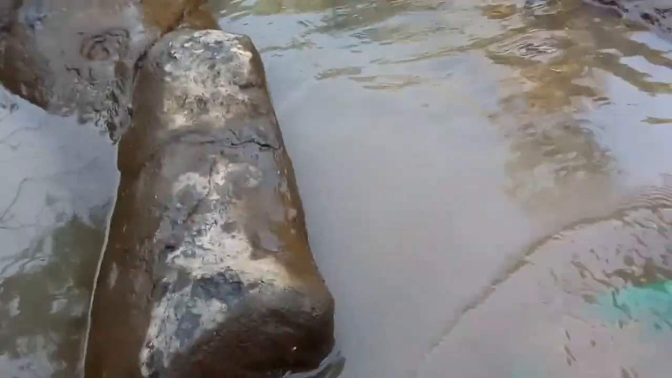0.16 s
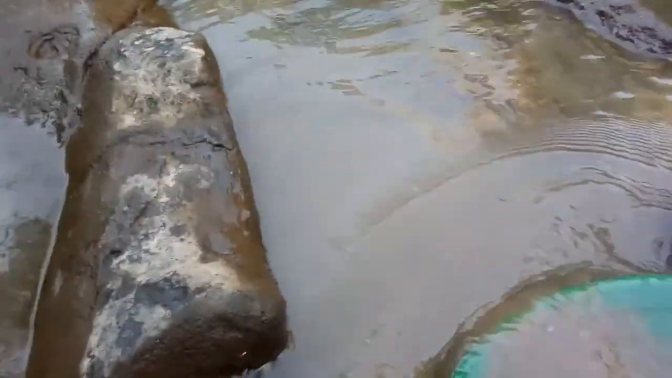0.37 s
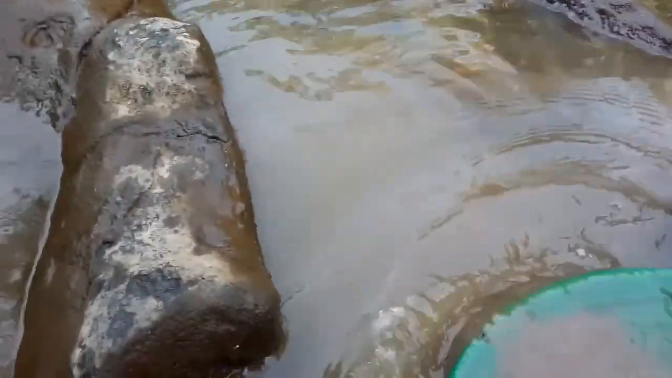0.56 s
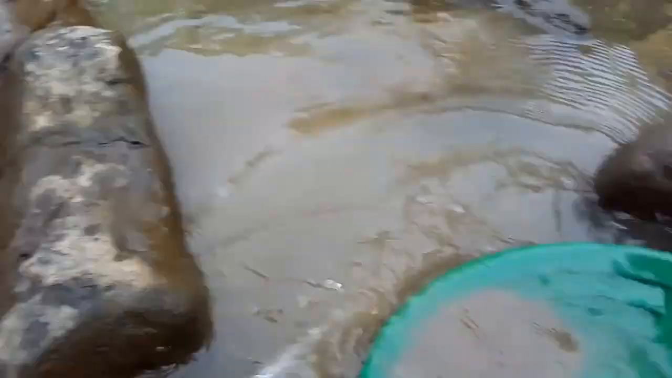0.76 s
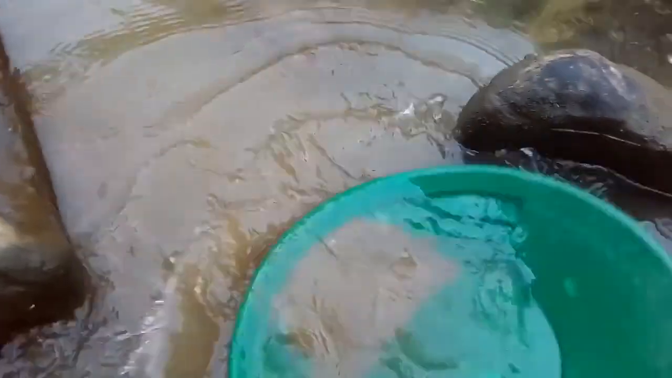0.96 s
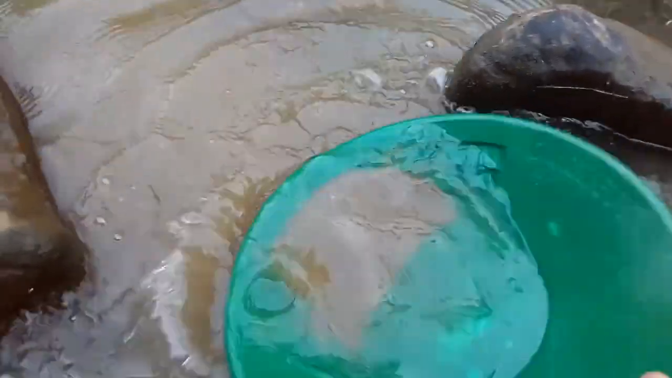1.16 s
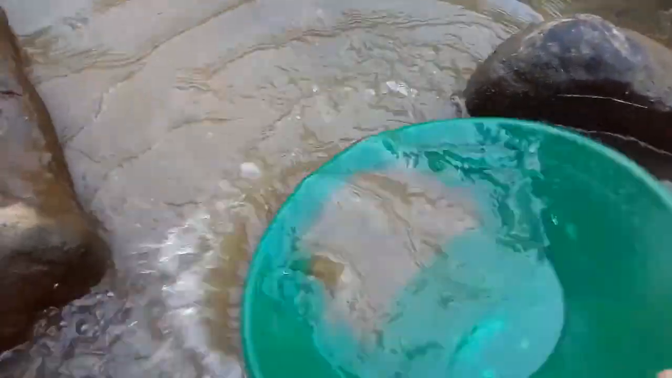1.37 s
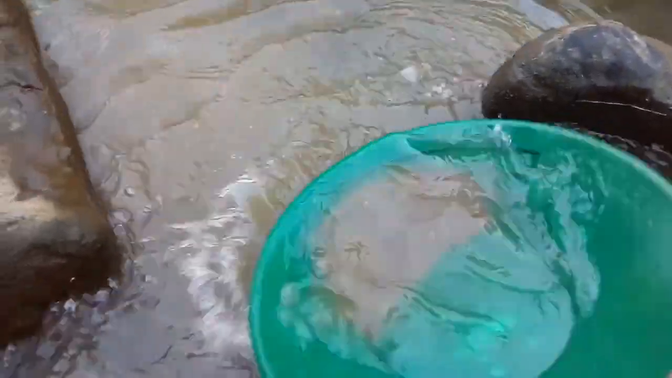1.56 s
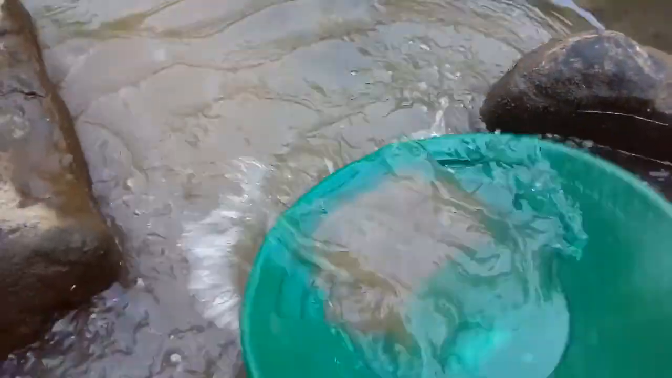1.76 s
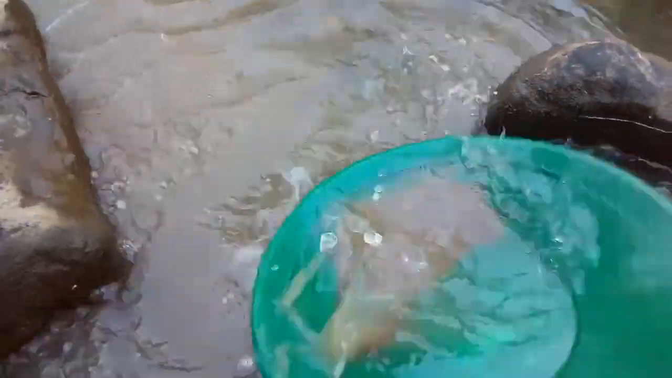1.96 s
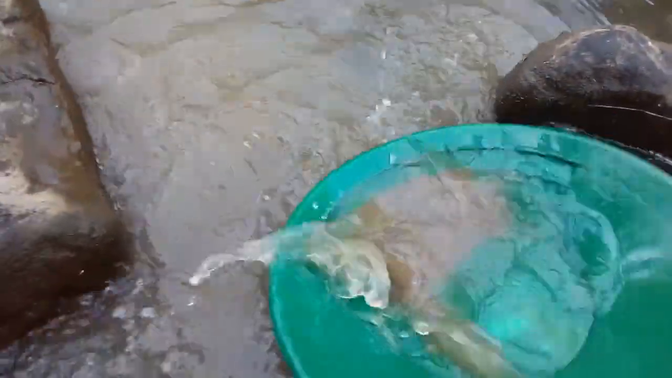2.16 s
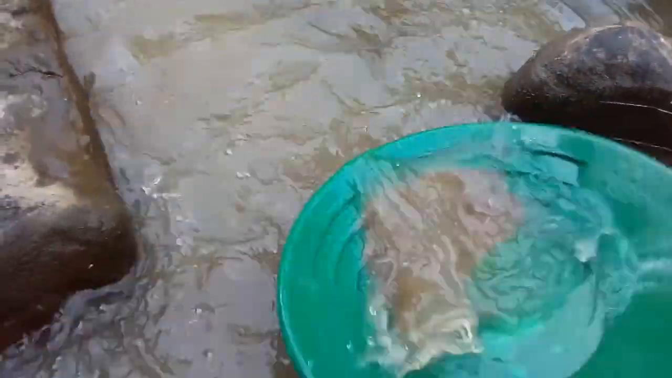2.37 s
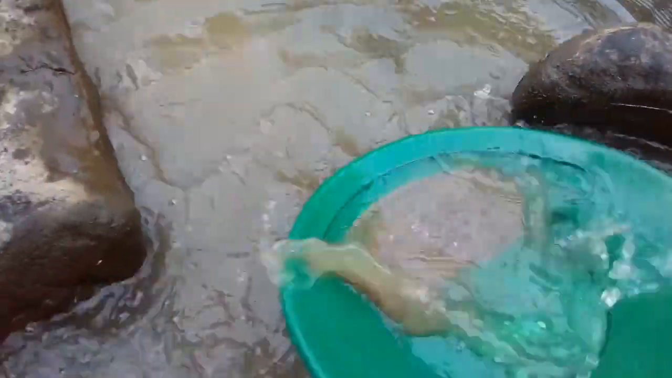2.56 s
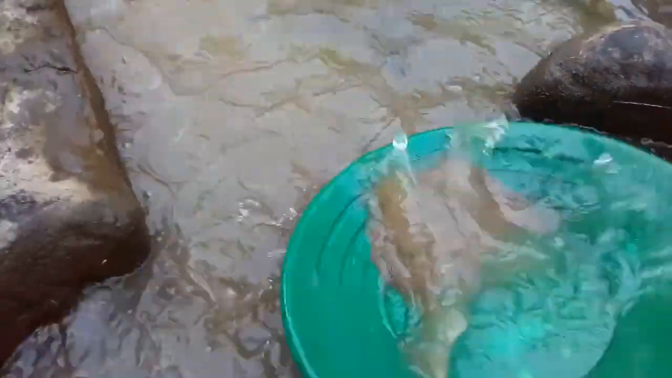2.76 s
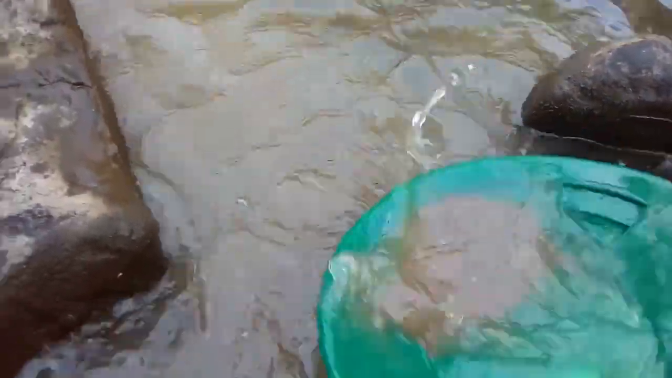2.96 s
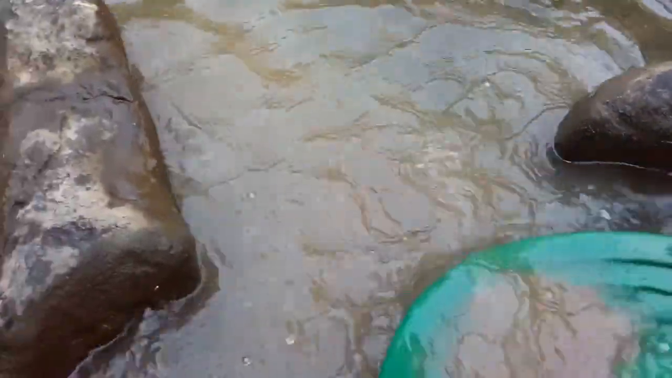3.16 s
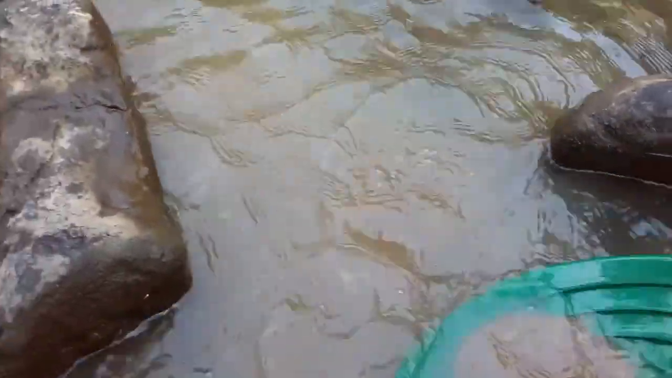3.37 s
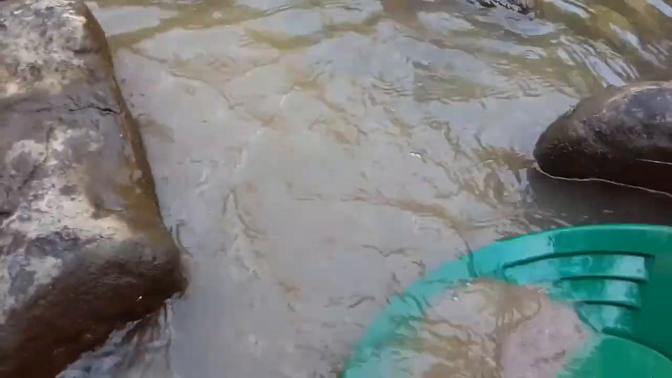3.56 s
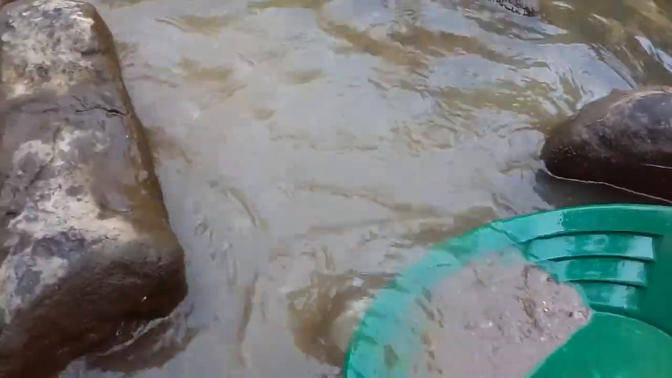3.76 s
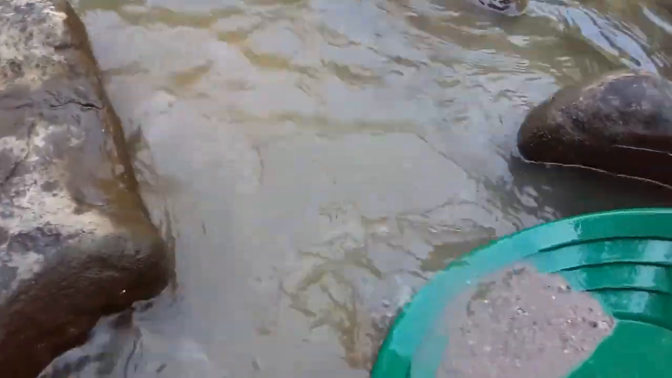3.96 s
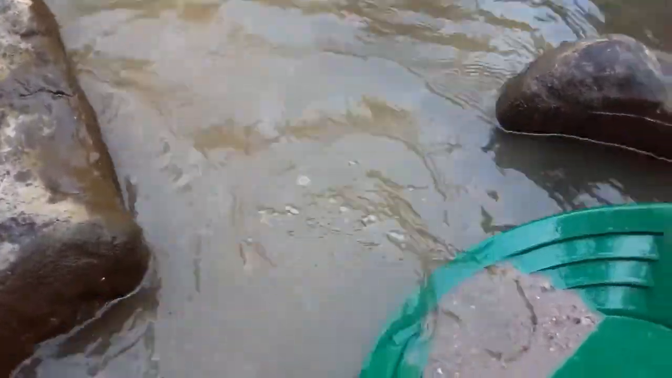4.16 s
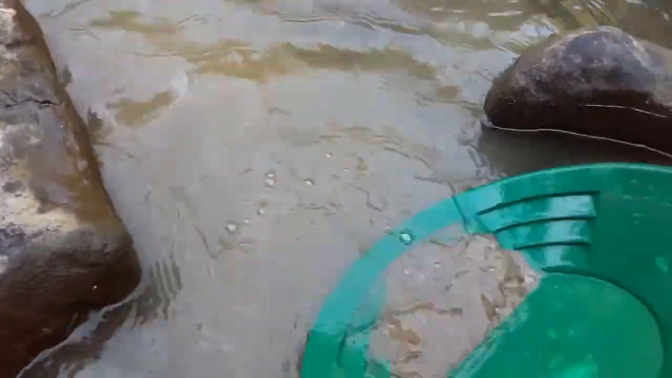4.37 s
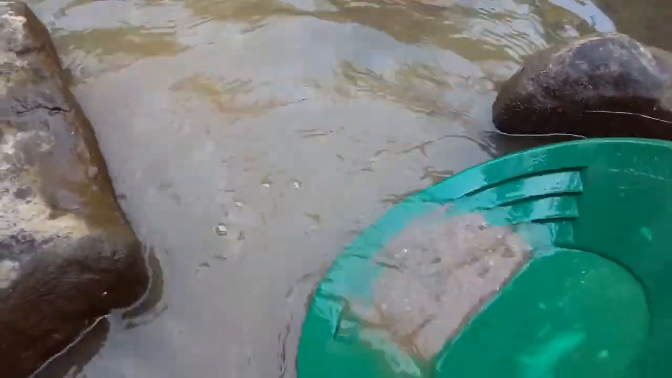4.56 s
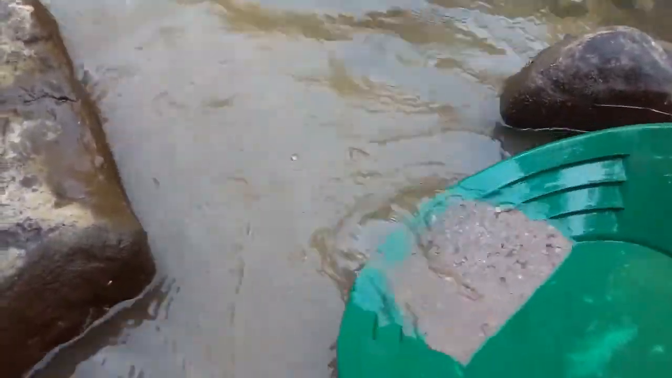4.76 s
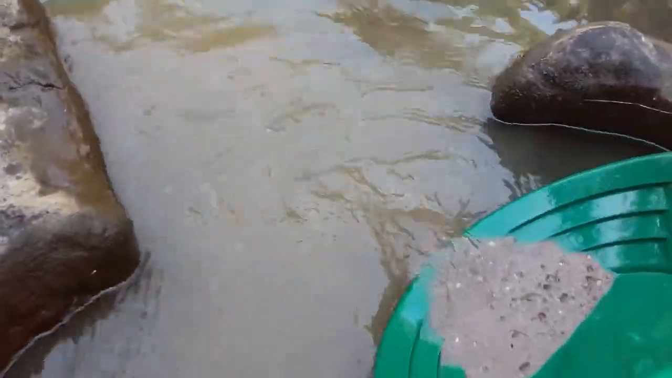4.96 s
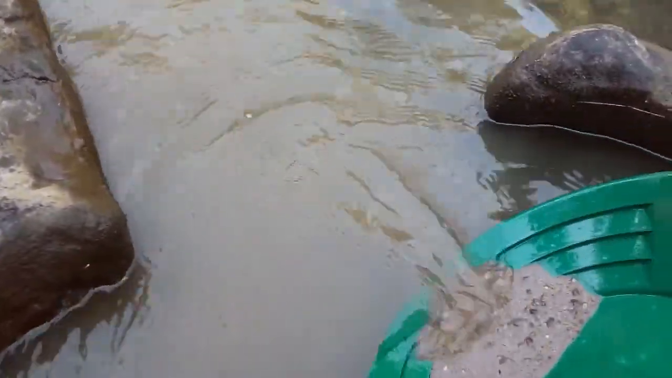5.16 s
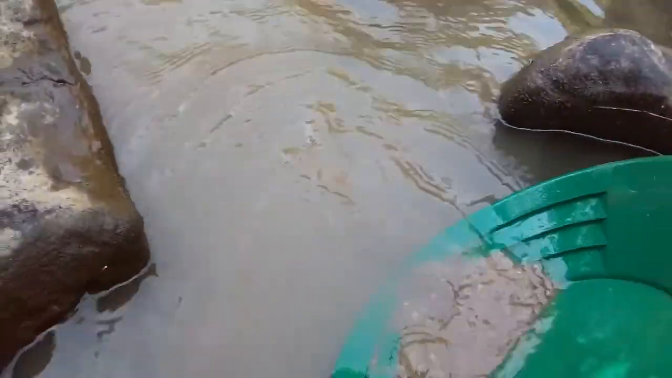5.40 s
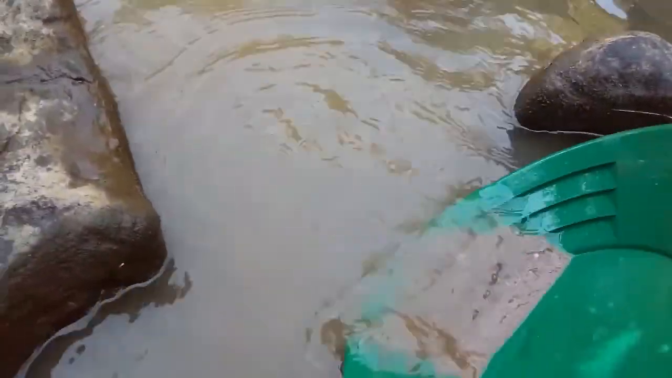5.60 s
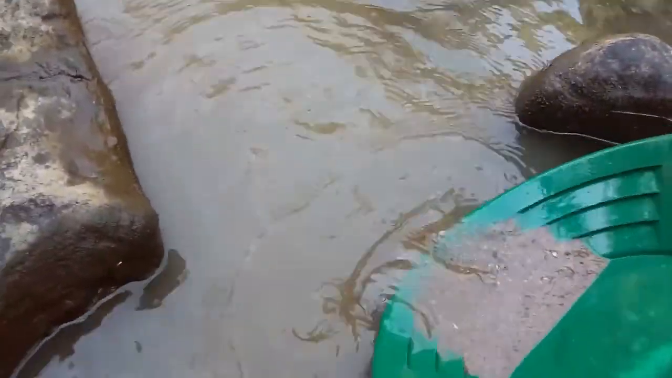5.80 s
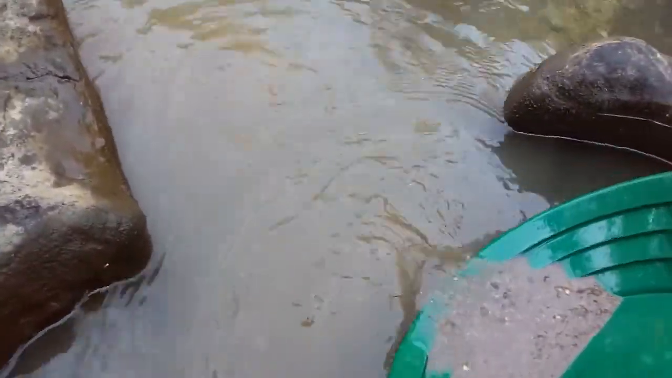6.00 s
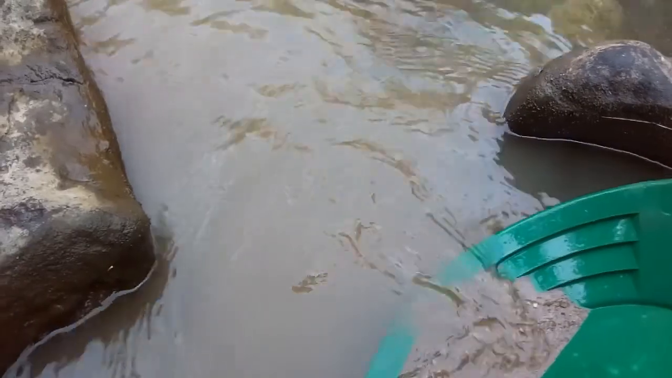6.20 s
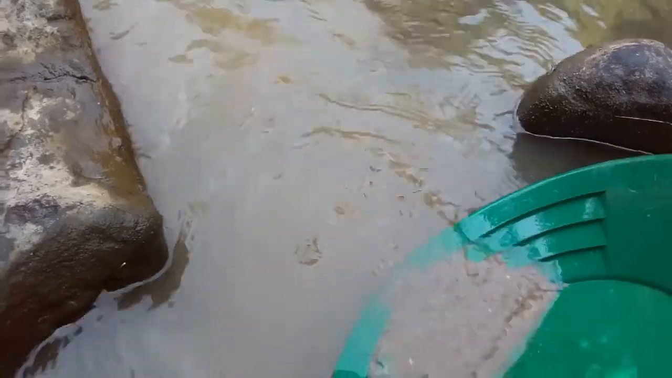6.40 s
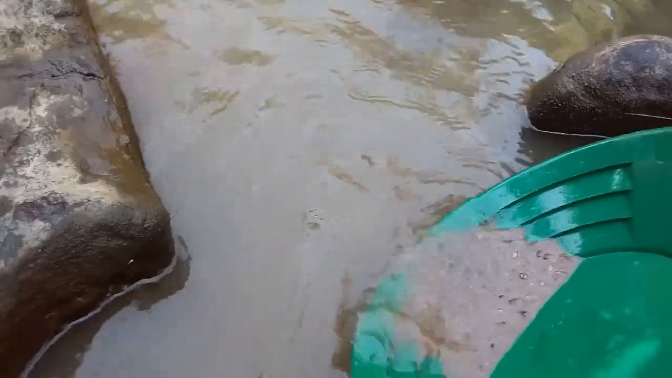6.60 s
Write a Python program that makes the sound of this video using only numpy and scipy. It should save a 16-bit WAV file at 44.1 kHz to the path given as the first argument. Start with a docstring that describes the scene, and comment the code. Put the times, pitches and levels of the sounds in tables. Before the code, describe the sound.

A plastic pan dips into shallow river water and swishes briskly with plops, slaps and spray, then drips quietly while birds call.

```python
"""A plastic gold pan full of gravel works a shallow, slow river whose quiet flow is shaped noise throughout.
One bird note, a sine glide, comes first; a noise sheet pours over the rim as the pan is dipped.
Three seconds of swishing follow: air rings as damped sines (plops, slaps, bloops, gurgle, spray), droplets click,
froth hisses, and the rim gulps in two wobbling modes. The lifted pan drains with a few drips and
a grit tick made of a noise burst; then more birds call from the bank, and the last drips fall among them."""
import sys
import numpy as np
from scipy import signal
from scipy.fft import rfft, irfft
from scipy.io import wavfile
from scipy.ndimage import uniform_filter1d

SR = 44100
rng = np.random.default_rng(int(sys.argv[2]) if len(sys.argv) > 2 else 0)


def put_to_file(sound):
    """Save the sound as 16-bit audio at rate SR, in the file named by the first command-line argument."""
    columns = np.atleast_2d(sound).T  # one column per channel
    safe = np.clip(columns, -1, 1)
    whole_steps = np.round(safe * 32767)
    wavfile.write(sys.argv[1], SR, whole_steps.astype(np.int16))


N = 292824
TIME = np.arange(N) / SR
CUTOFF_HZ = 15800


def from_db(db):
    """Decibels to amplitude."""
    return 10 ** (np.asarray(db) / 20)


def rms_one(x):
    """Scales the whole array to rms 1."""
    return x / np.sqrt(np.mean(x ** 2) + 1e-20)


def at_hz(points, hz, axis=1):
    """Reads one column of a table on a log-frequency axis."""
    points = np.array(points, float)
    return np.interp(np.log(hz), np.log(points[:, 0]), points[:, axis])


def panned(pan_db):
    """Left and right gains at constant total power; positive leans left."""
    return from_db(np.array([[pan_db], [-pan_db]]) / 2) / np.sqrt(np.cosh(pan_db * np.log(10) / 20))


def add(out, s, sound):
    """Mixes a sound in at a time in seconds."""
    i = int(np.clip(round(s * SR), 0, N))
    out[:, i:i + sound.shape[-1]] += sound[..., :N - i]


def band(x, low_hz, high_hz):
    """Band-pass, kept under the Nyquist limit."""
    edges_hz = [low_hz, min(high_hz, SR / 2 - 100)]
    return signal.sosfilt(signal.butter(2, edges_hz, "band", fs=SR, output="sos"), x)


def coloured_noise(spectrum):
    """Two unrelated smooth noises with the given spectrum; rms 1."""
    hz = np.maximum(np.arange(N // 2 + 1) * SR / N, 1)
    white = rfft(rng.standard_normal((2, N)))
    return rms_one(irfft(white * from_db(at_hz(spectrum, hz)), N))


def evened(x, seconds):
    """Holds the rms near 1 over a stretch of time, leaving single grains free."""
    size = int(seconds * SR)
    power = uniform_filter1d(uniform_filter1d(np.mean(x ** 2, 0), size), size)
    return x / np.sqrt(np.abs(power) + 0.033 * np.mean(x ** 2))


def bubble(hz, t60_s, rise, lag_s, swell_cycles):
    """A damped sine swells over some cycles, its pitch shifts by the share rise per t60, and one side lags."""
    t = np.arange(int((t60_s + abs(lag_s)) * SR) + 2) / SR
    t = np.maximum(t - np.array([[max(lag_s, 0)], [max(-lag_s, 0)]]), 0)
    envelope = (1 - np.exp(-t * hz / swell_cycles)) * from_db(-60 * t / t60_s)
    return envelope * np.sin(2 * np.pi * hz * t * (1 + rise * t / t60_s / 2))


def slosh(gurgle_db=0.0, spray_db=-1.0, crackle_db=-13, froth_db=-7):
    """Stirring traps bubbles, throws spray and droplets, and leaves a thin hiss of froth."""
    churned, thrown = from_db(stirring())
    froth = coloured_noise([(250, -13.5), (700, -7.0), (2500, 2.0), (6300, -14), (8500, -14.5), (16000, -25.5)])
    bubbles = churned * from_db(gurgle_db) * gurgle(churned)
    drops = thrown * (from_db(spray_db) * spray() + from_db(crackle_db) * crackle())
    return bubbles + drops + np.sqrt(churned * thrown) * from_db(froth_db) * froth


def stirring(attack_s=0.005, fall_db_per_s=466.5, ragged_db=2.5, ragged_s=0.011):
    """Drives gurgle and spray in dB: each wave swells, holds and drains on top of ragged churning."""
    # Churning, which builds while the pan is worked and dies as it is lifted.
    # Each row: time in seconds, level in dB.
    churning = [(0.12, -80), (0.3, -67), (0.5, -61), (0.75, -53), (1.0, -55), (1.25, -47.5), (1.6, -51.5),
                (1.95, -46), (2.15, -49), (2.6, -48), (2.74, -52), (2.87, -59), (3.06, -55), (3.23, -74),
                (3.38, -72.5), (3.65, -81.5), (4.14, -80), (6.6, -90.5)]
    # Waves that the pushes of the pan send over its rim.
    # Each row: start in seconds, hold in seconds, gurgle drive in dB, spray drive in dB.
    surges = [(0.643, 0.034, -45, -49), (0.726, 0.012, -43.5, -67), (0.797, 0.038, -46, -52.5),
              (0.923, 0.011, -49, -54), (1.043, .015, -43.5, -63), (1.078, 0.0077, -47.5, -45.5),
              (1.138, 0.0036, -63, -42), (1.222, .05, -45.5, -43), (1.302, 0.029, -47, -44),
              (1.434, 0.027, -42, -42), (1.513, 0.055, -62.5, -41.5), (1.625, 0.077, -46.5, -46.5),
              (1.734, 0.017, -40, -32), (1.856, 0.041, -41, -38.5), (1.948, 0.033, -46, -34.5),
              (2.007, 0.037, -50.5, -35), (2.07, 0.032, -41, -41.5), (2.167, 0.045, -43, -41.5),
              (2.367, 0.0039, -47.5, -43), (2.407, 0.071, -61.5, -43.5), (2.475, 0.05, -49, -53),
              (2.67, 0.013, -37.5, -41.5), (2.956, 0.024, -55.5, -43), (3.11, 0.063, -57.5, -69),
              (3.803, 0.072, -63.5, -70)]
    power = from_db(np.interp(TIME, *np.transpose(churning))) ** 2
    for s, hold_s, gurgle_db, spray_db in surges:
        swell = np.clip((TIME - s) / attack_s, 0, 1)
        draining_s = np.maximum(TIME - s - attack_s - hold_s, 0)
        wave = swell * from_db(-fall_db_per_s * np.minimum(draining_s, 1))
        power = power + (from_db([[gurgle_db], [spray_db]]) * wave) ** 2
    ragged = rms_one(uniform_filter1d(rng.standard_normal(N), int(ragged_s * SR)))
    return 10 * np.log10(power) + ragged_db * ragged


def gurgle(churned, crowded_db=-42, thinning=0.65, cycles=26, size_db=3.5, pan_db=-4.5, spread_db=3.0,
           lag_s=0.0001, count=8000):
    """Middle-sized bubbles differ in pitch, damping and place: dense in brisk water, few in calm water."""
    # Gurgle spectrum. Each row: frequency in Hz, level in dB.
    spectrum = [(300, -17.5), (450, -14.5), (700, -2.5), (1100, -0.5), (1800, 0.5), (2600, 4.5),
                (3400, -19.5)]
    share = (churned / from_db(crowded_db)) ** thinning  # share of the candidates that sound
    out, low_hz, high_hz = np.zeros((2, N)), spectrum[0][0], spectrum[-1][0]
    uniform, normal = rng.random((count, 4)), rng.standard_normal((count, 4))
    for (when, pitch, rise, luck), (size, damping, side, lag) in zip(uniform, normal):
        if luck > share[int(when * N)]:
            continue
        hz = low_hz * (high_hz / low_hz) ** pitch
        rings = np.clip(cycles * np.exp(0.5 * damping), 3, 50)
        height = from_db(at_hz(spectrum, hz) + size_db * min(size, 2)) * np.sqrt(hz / rings)
        ring = bubble(hz, rings / hz, 0.55 * rise, lag_s * lag, swell_cycles=0.37)
        add(out, when * N / SR, height * panned(pan_db + spread_db * side) * ring)
    return evened(out, seconds=0.055)


def spray(per_s=10000, size_db=7.5, clump_db=4.5, clump_s=0.0047, sharpness=11.0, pan_db=-2.5,
          spread_db=11.5, lag_s=0.0002, bands=40):
    """Tiny bubbles and droplets ring for a few cycles all over the treble, louder in clumps."""
    # Spray spectrum. Each row: frequency in Hz, level in dB.
    spectrum = [(2500, -6.5), (3300, -1), (4500, 0.5), (6300, 3.5), (7300, -2.5), (8500, -10.5),
                (11000, -9), (13500, -14), (16000, -1.5)]
    out, n = np.zeros((2, N)), int(per_s * N / SR / bands)
    clumps = rms_one(uniform_filter1d(rng.standard_normal(N), int(clump_s * SR)))
    for hz in np.geomspace(spectrum[0][0], CUTOFF_HZ, bands):
        at = rng.integers(0, N, n)
        size, side, lag, push = np.clip(rng.standard_normal((4, n)), -2, 2)
        height_db = at_hz(spectrum, hz) + size_db * size + clump_db * clumps[at]
        height = np.sign(push) * from_db(height_db) / np.sqrt(hz)
        pan = from_db((pan_db + spread_db * side) / 2)
        births = np.full((2, N), 1e-18)
        births[0, at] = height * pan
        births[1, (at + np.round(lag * lag_s * SR).astype(int)) % N] = height / pan
        out += band(births, hz * (1 - 0.5 / sharpness), hz * (1 + 0.5 / sharpness))
    return evened(out, seconds=0.13)


def crackle(per_s=110, size_db=5.0, snap_db=-17):
    """Flung droplets land as lone sharp clicks."""
    sizes = from_db(size_db * np.clip(rng.standard_normal((2, N)), -2, 2))
    clicks = (rng.random(N) < per_s / SR) * sizes + 1e-18
    return rms_one(band(clicks, 4300, 7270) + from_db(snap_db) * band(clicks, 5500, CUTOFF_HZ))


def splashing_rings(rows, cycles, swell_cycles, rise, splash_db, lag_s=0.0001, splash_t60_s=0.096,
                    damping=0.14, middling_db=-26):
    """Single pockets of air ring for some cycles, gentle ones longer; each is born in a short splash."""
    out, t = np.zeros((2, N)), np.arange(SR // 20) / SR
    for (s, hz, db, pan_db), chance in zip(rows, rng.standard_normal((len(rows), 2))):
        t60_s = cycles / hz * from_db(damping * (middling_db - db))
        ring = bubble(hz, t60_s, rise * (1 + 0.5 * chance[1]), lag_s * chance[0], swell_cycles)
        splash = rms_one(band(rng.standard_normal((2, len(t))), hz / 2, hz * 2))
        splash = splash * from_db(-60 * t / min(splash_t60_s, 2 * t60_s))
        add(out, s, from_db(db) * panned(pan_db) * ring)
        add(out, s, from_db(db + splash_db) * panned(pan_db) * splash)
    return out


def plops():
    """Single ringing bubbles, loud and soft, with the later drips."""
    # Each row: start in seconds, pitch in Hz, level in dB, left-right in dB.
    plop_rows = [(0.339, 860, -45, 2), (0.548, 2110, -35, -8), (0.648, 1500, -35, -14),
                 (0.732, 574, -38.5, 1), (0.749, 1470, -30.5, -4), (0.856, 906, -34, -8),
                 (0.888, 2020, -25.5, -7), (1.084, 3180, -29, -5.5), (1.092, 1400, -36, -10),
                 (1.219, 771, -28, -4), (1.288, 498, -38, -2.5), (1.327, 1126, -30, -10),
                 (1.388, 1140, -25.5, -3), (1.389, 628, -33.5, -9), (1.559, 2060, -25, -5),
                 (1.961, 1580, -18.5, -8.5), (2.031, 3100, -22.5, -1), (2.305, 900, -28.5, -8),
                 (2.309, 1520, -28.5, -7), (2.501, 1630, -24, -10), (2.682, 1840, -30, -4),
                 (2.808, 3670, -24, -3), (2.849, 2650, -29, -8), (2.909, 1440, -28.5, -5),
                 (2.951, 985, -37, 4), (2.981, 10000, -24.5, -5), (2.985, 2670, -25.5, 0),
                 (3.116, 1960, -40.5, -19), (3.163, 1026, -36, 2), (3.25, 3120, -44, 0),
                 (3.784, 2750, -52, -7), (3.79, 1430, -43.5, -10), (3.82, 2040, -50, -8),
                 (3.824, 9400, -41.5, 1), (3.834, 3630, -37, 0), (3.847, 3980, -39, 1),
                 (3.928, 6180, -39.5, -5), (3.935, 750, -52, -1), (5.18, 811, -57.5, -2.5),
                 (5.197, 5850, -56.5, -6), (5.806, 1810, -60.5, 2)]
    return splashing_rings(plop_rows, cycles=37.2, swell_cycles=0.19, rise=0.12, splash_db=-21.5)


def slaps():
    """Water slaps shut on the pan or the surface: a knock with a fairly short ring and a strong splash."""
    # Each row: start in seconds, pitch in Hz, level in dB, left-right in dB.
    slap_rows = [(0.5015, 2390, -26, -1), (0.6335, 2590, -9.5, 9.5), (0.732, 2230, -20.5, -1),
                 (0.8555, 1550, -20.5, -3), (0.8865, 1430, -29.5, -8), (0.946, 6200, -19, -11),
                 (1.0255, 1700, -29.5, -4), (1.0422, 5700, -20.5, -1), (1.0607, 2300, -15, -6),
                 (1.226, 785, -26.5, -1), (1.445, 2720, -25, -1), (1.6965, 3300, -20, -9),
                 (1.72, 2660, -19.5, -4.5), (1.7955, 1750, -13, -7), (1.9555, 5650, -11, -20),
                 (2.222, 1750, -12, -6.5), (2.2232, 2540, -7.5, -1), (2.2995, 2700, -18.5, 0),
                 (2.356, 3230, -24, -1), (3.3745, 1055, -47, -1), (3.699, 1970, -45, -7),
                 (3.7915, 1010, -46, 0), (3.847, 1930, -50, -6)]
    return splashing_rings(slap_rows, cycles=23, swell_cycles=0.48, rise=0.1, splash_db=-15.0)


def bloops(peak_at=0.05):
    """Bubbles, from tiny chirps to longer bloops, swell quickly, fade in an arc and climb ever faster."""
    # Each row: start in seconds, length in seconds, start pitch in Hz, end pitch in Hz, level in dB,
    # left-right in dB.
    bloop_rows = [(0.441, 0.0025, 6330, 6600, -32, -6), (0.6045, 0.021, 1010, 1070, -30, -3.5),
                  (1.205, 0.014, 1377, 1510, -25, -10), (1.2666, 0.0053, 4500, 4750, -24, -1),
                  (1.327, 0.0035, 7050, 7460, -25, -5), (3.0321, 0.0065, 3410, 4600, -28, -1),
                  (3.056, 0.019, 1010, 1120, -34.5, 6), (3.7, 0.072, 625, 865, -51, -7),
                  (3.854, 0.042, 988, 1010, -47.5, 13), (3.992, 0.02, 1000, 1810, -57.5, -9),
                  (4.016, 0.014, 1860, 3000, -52.5, -12)]
    out = np.zeros((2, N))
    for s, length_s, start_hz, end_hz, db, pan_db in bloop_rows:
        u = np.linspace(0, 1, int(length_s * SR))
        hz = start_hz + (end_hz - start_hz) * (u + u ** 2) / 2
        arc = np.sin(np.pi / 2 * np.interp(u, [0, np.clip(peak_at, 0, 0.5), 1], [0, 1, 2])) ** 2
        add(out, s, from_db(db) * panned(pan_db) * arc * np.sin(2 * np.pi * np.cumsum(hz) / SR))
    return out


def inflow(start_s=0.21, full_s=0.23, end_s=1.0, level_db=-59):
    """A smooth sheet of water runs over the rim as the pan first goes under."""
    flow = np.interp(TIME, [start_s, full_s, end_s], [0, 1, 0])
    sheet = coloured_noise([(200, 1), (1100, 3.5), (3000, -6), (6500, -4), (8500, -25)])
    return from_db(level_db) * flow * sheet


def gulps(rise=0.096, low_pan_db=2.0, high_pan_db=-5.0, wobble=0.043, rough=0.37):
    """A pocket under the rim rings in two modes that wobble and flutter with its shape and climb as it shrinks."""
    # Each row: start in seconds, length in seconds, low mode in Hz, its level in dB, high mode in Hz,
    # its level in dB.
    gulp_rows = [(0.851, 0.017, 370, -46.5, 544, -38.5), (1.027, 0.014, 383, -42.5, 724, -44),
                 (1.223, 0.034, 406, -49, 570, -46), (1.852, 0.046, 384, -35, 702, -35),
                 (2.085, 0.015, 310, -45.5, 612, -42), (2.277, 0.03, 356, -38, 660, -38.5),
                 (2.47, 0.038, 379.6, -33, 708, -29.5), (2.604, 0.018, 610, -47.5, 1350, -25),
                 (2.665, 0.029, 345, -43, 684, -36.5)]
    out, knots = np.zeros((2, N)), np.linspace(0, 1, 10)
    for s, length_s, low_hz, low_db, high_hz, high_db in gulp_rows:
        u = np.linspace(0, 1, int(length_s * SR))
        shape = np.interp(u, knots, rng.standard_normal(10))
        turn = 2 * np.pi * np.cumsum(1 + rise * (u - 0.5) + wobble * (shape - shape.mean())) / SR
        flutter = 1 + rough * np.interp(u, knots, rng.standard_normal(10))
        swell = np.sin(np.pi * u) ** 2 * flutter
        low = from_db(low_db) * swell * np.sin(low_hz * turn)
        high = from_db(high_db) * swell * np.sin(high_hz * turn)
        add(out, s, panned(low_pan_db) * low + panned(high_pan_db) * high)
    return out


def ticks(t60_s=0.0046, level_db=1.0, snap_db=7.0, softening=0.22):
    """Grit and droplets tick on the pan as tiny cracks; harder ones carry a brighter snap."""
    # Each row: start in seconds, relative level in dB.
    tick_rows = [(0.04, -49), (0.521, -40), (0.67, -32), (0.7976, -28), (0.806, -34.5), (2.3547, -33),
                 (2.408, -25), (2.578, -27), (2.687, -30.5), (2.808, -28.5), (2.849, -31), (3.2495, -56),
                 (3.8196, -53)]
    out, t = np.zeros((2, N)), np.arange(SR // 20) / SR
    for s, db in tick_rows:
        burst = rng.standard_normal((2, len(t))) * from_db(-60 * t / t60_s)
        snap = from_db(snap_db + softening * db) * band(burst, 15600, CUTOFF_HZ)
        crack = band(burst, 2700, 6800) + snap
        add(out, s, from_db(db + level_db) * crack / np.abs(crack).max() * 2)
    return out


def echoes(x, t60_s, first_s, low_hz, high_hz):
    """Diffuse scatter from the surroundings: a decaying noise tail of unit energy, then band-limited."""
    t = np.arange(SR) / SR
    tail = rng.standard_normal((2, SR)) * from_db(-60 * t / t60_s) * (t > first_s)
    tail /= np.sqrt(np.sum(tail ** 2, 1, keepdims=True))
    return band(signal.fftconvolve(x, tail, axes=1)[:, :N], low_hz, high_hz)


def birds(direct_db=-3.0, trees_db=2.0, waver=0.0073, octave_db=-16):
    """Unsteady whistled glides with a faint octave, smeared by the trees, where high notes fade first."""
    # Each row: start in seconds, length in seconds, start, middle and end pitch in Hz, relative level in dB.
    notes = [(0.046, 0.058, 2600, 2602, 2474, -61), (4.255, 0.088, 4980, 5080, 4930, -61.5),
             (4.285, 0.076, 5150, 5380, 5100, -68.5), (4.327, 0.085, 2730, 2260, 1690, -59),
             (4.36, 0.058, 2675, 2655, 2050, -59.5), (5.933, 0.08, 4660, 4540, 4550, -72),
             (6.025, 0.098, 4540, 4470, 4490, -62), (6.197, 0.15, 4046, 4120, 4020, -73),
             (6.315, 0.12, 4430, 4480, 4460, -65.5), (6.46, 0.172, 4235, 4170, 4100, -71),
             (6.57, 0.07, 2670, 2580, 2590, -75)]
    out = np.zeros((2, N))
    for s, length_s, start_hz, middle_hz, end_hz, db in notes:
        u = np.linspace(0, 1, int(length_s * SR))
        hz = np.polyval(np.polyfit([0, 0.5, 1], [start_hz, middle_hz, end_hz], 2), u)
        hz = hz * (1 + waver * np.interp(u, np.linspace(0, 1, 20), rng.standard_normal(20)))
        turn = 2 * np.pi * np.cumsum(hz) / SR
        whistle = np.sin(turn) + from_db(octave_db) * np.sin(2 * turn)
        add(out, s, from_db(db) * np.sqrt(np.abs(np.sin(np.pi * u))) * whistle)
    trees = echoes(out, t60_s=0.72, first_s=0, low_hz=980, high_hz=3100)
    trees = trees + echoes(out, t60_s=0.47, first_s=0, low_hz=3500, high_hz=6500)
    return from_db(direct_db) * band(out, 920, 6000) + from_db(trees_db) * trees


def bumps():
    """Soft low bumps at the microphone: brief swells of rumble."""
    # Each row: start in seconds, length in seconds, level in dB.
    bump_rows = [(0.817, 0.2, -63.5), (3.352, 0.2, -56.5)]
    swell = np.zeros(N)
    for s, length_s, db in bump_rows:
        swell += from_db(db) * np.sin(np.pi * np.clip((TIME - s) / length_s, 0, 1)) ** 2
    return swell * rms_one(band(rng.standard_normal((2, N)), 53, 112))


def river(level_db=-68.98):
    """The even rush of the flow farther off: mid and side noise set the likeness of the two ears."""
    # River spectrum. Each row: frequency in Hz, level in dB.
    spectrum = [(25, -14), (55, -8), (97, -3.5), (300, -5), (680, -8), (830, -2.5), (1050, -12.5),
                (2000, -14.5), (4200, -22.5), (6000, -23.5), (8000, -31.5), (13500, -35), (16000, -24.5)]
    # River between the ears. Each row: frequency in Hz, likeness (correlation, -1 to 1), left-right in dB.
    stereo = [(100, 0.024, -1.5), (338.4, 0.42, 2), (770, 0.36, 1.5), (1430, -0.41, -6),
              (2500, -0.05, -0.5)]
    hz = np.maximum(np.arange(N // 2 + 1) * SR / N, 1)
    mid, side = rfft(coloured_noise(spectrum))
    alike, signs = np.clip(at_hz(stereo, hz), -1, 1), np.array([[1], [-1]])
    both = mid + np.sqrt((1 - alike) / (1 + alike)) * side * signs
    both = both * from_db(signs * at_hz(stereo, hz, axis=2) / 2)
    return from_db(level_db) * irfft(both, N)


def scene(rocks_db=-6.0, bank_db=-15.5, lowest_hz=210):
    """Small bubbles radiate no bass; the rocks scatter their sound at once, the bank faintly and later."""
    bubbles = slosh() + plops() + slaps() + bloops() + inflow()
    bubbles = signal.sosfilt(signal.butter(3, lowest_hz, "high", fs=SR, output="sos"), bubbles)
    water = bubbles + gulps() + ticks()  # all that sounds at the pan
    rocks = from_db(rocks_db) * echoes(water, t60_s=0.034, first_s=0.00095, low_hz=620, high_hz=11900)
    bank = from_db(bank_db) * echoes(water, t60_s=0.16, first_s=0.0092, low_hz=399, high_hz=5740)
    return water + rocks + bank + birds() + bumps() + river()


def record(dry, port_hz=15100, port_width_hz=900, port_db=-8.5):
    """The microphone port rings in the high treble; the top is cut."""
    port = signal.lfilter(*signal.iirpeak(port_hz, port_hz / port_width_hz, fs=SR), dry)
    top_cut = signal.ellip(10, 0.2, 70, CUTOFF_HZ, fs=SR, output="sos")
    return signal.sosfilt(top_cut, dry + from_db(port_db) * port)


dry = scene()
out = record(dry)
put_to_file(out)
```